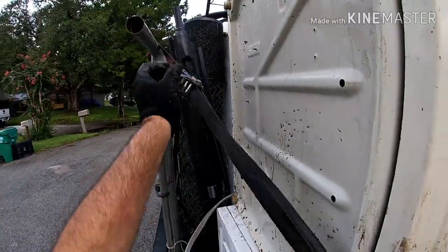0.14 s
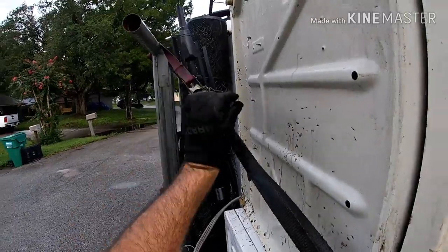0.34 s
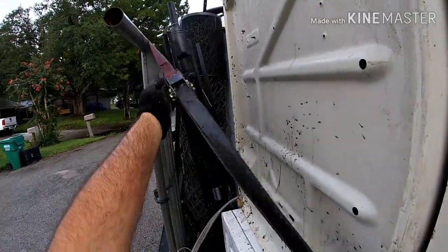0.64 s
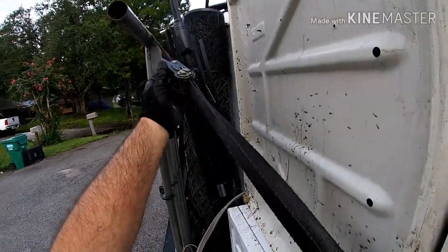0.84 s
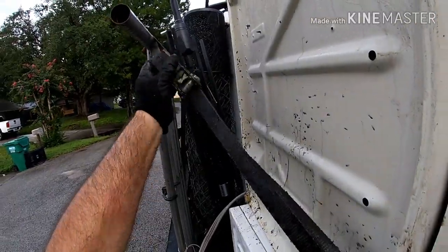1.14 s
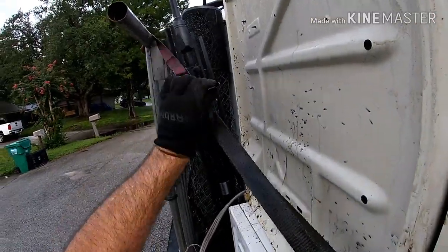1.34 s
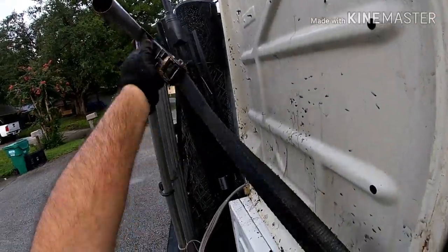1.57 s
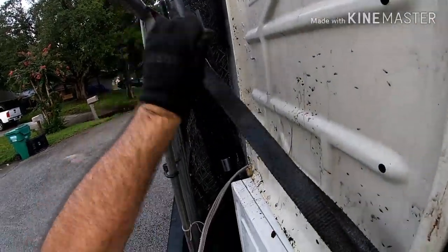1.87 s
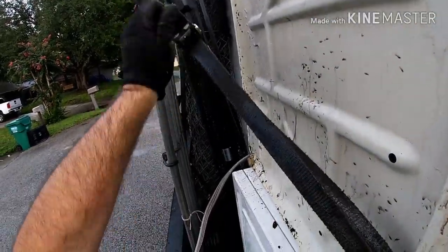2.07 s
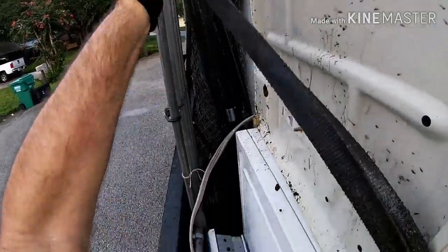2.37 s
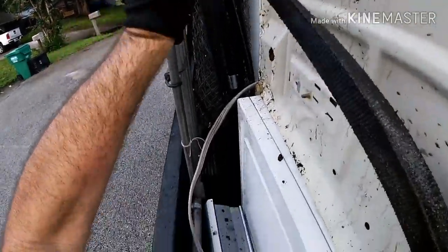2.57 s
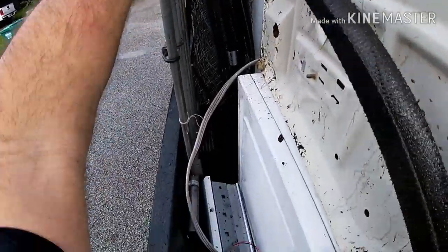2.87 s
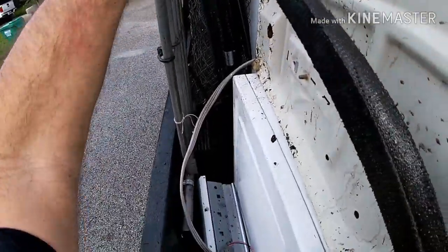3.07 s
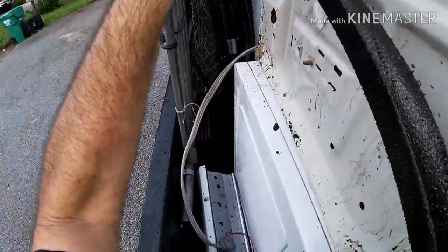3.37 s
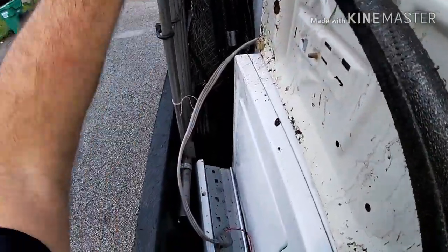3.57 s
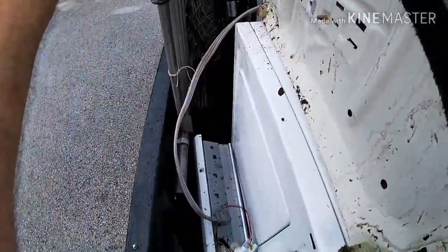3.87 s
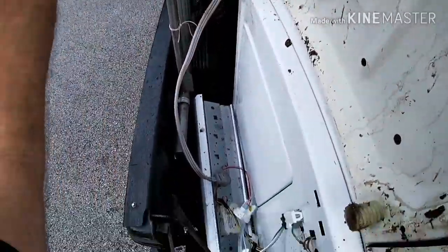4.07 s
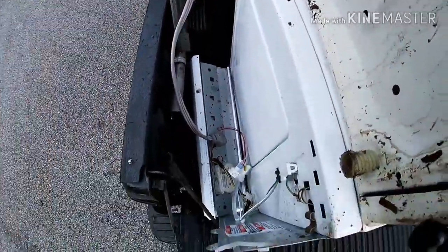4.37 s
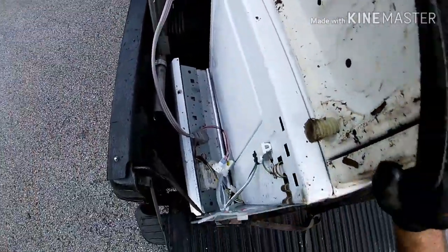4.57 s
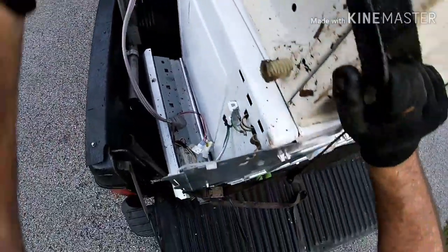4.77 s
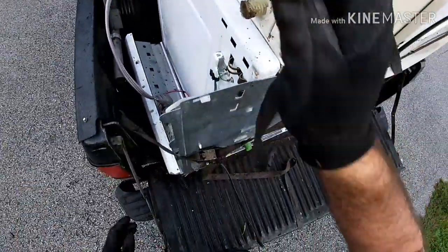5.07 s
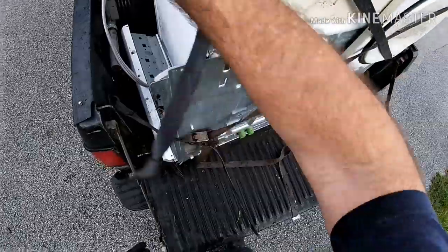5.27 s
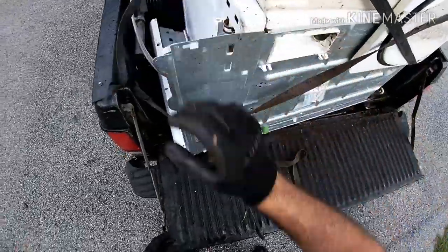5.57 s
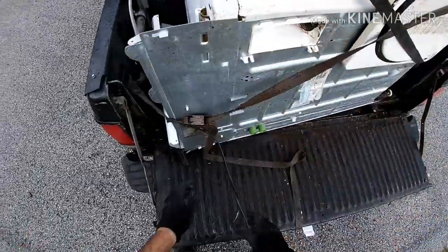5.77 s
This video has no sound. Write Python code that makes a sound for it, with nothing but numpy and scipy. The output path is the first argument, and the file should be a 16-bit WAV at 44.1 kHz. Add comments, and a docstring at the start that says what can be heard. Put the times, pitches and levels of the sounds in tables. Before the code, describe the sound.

A truck idles outdoors for the whole six seconds, a low, nearly steady drone around 100 Hz with a slight lope, rumble and soft engine-bay hiss. Very close and dry, a ratchet strap is cranked. One snap comes at 0.1 s, then a quick run of three at 0.27-0.37 and another at 0.65-0.72. After a pause with faint ticks, three more follow at 1.33-1.44. From 1.7 to 4.25 the bright steel clicks come mostly in pairs, a few times a second, with webbing rasp, glove rustle, loose handle ticks, brief zips and creaks. The sheet-metal load booms dully beneath, strongest near 3.7. A weak click at 4.4 and a strong last one at 4.55 end the cranking. Slight rubbing and tiny ticks fade by 5.2, leaving the idle. At 5.75 a single dull, heavy knock lands near the tailgate with a short panel rumble, as the hiss rises slightly.

```python
"""Outdoors, close beside a truck bed: a ratchet strap is cranked tight while the truck idles.
The idle is a stack of exhaust harmonics over rumble and engine-bay hiss; webbing and glove rub as coloured noise.
The steel pawl snaps as shaped noise through frame resonances, each tooth jolts the load, and the load booms dully.
Short fuzzy tones of narrow noise give a rustle, handle clunks, and zips and creaks of the strap.
Once the cranking is over, something knocks once near the tailgate: a light touch, a weight and a panel rumble."""
import sys
import numpy as np
from scipy import signal
from scipy.fft import rfft, irfft, next_fast_len
from scipy.io import wavfile
from scipy.ndimage import uniform_filter1d, map_coordinates

SR = 44100
rng = np.random.default_rng(int(sys.argv[2]) if len(sys.argv) > 2 else 0)


def inscribe(sig):
    """Save sig as 16-bit PCM at rate SR to the path in sys.argv[1].

    A 1-D sig is mono; a 2-D sig holds one channel per row.
    Samples are clipped to [-1, 1] before scaling.
    """
    pcm = np.round(np.clip(np.atleast_2d(sig).T, -1, 1) * 32767)
    wavfile.write(sys.argv[1], SR, pcm.astype(np.int16))


N = 261072  # samples

# Engine cycle rate: (t/s, f/Hz)
CYCLE_RATE = [(0.0, 19.29), (0.2, 19.56), (0.4, 19.78), (1.3, 19.78), (1.6, 19.66), (1.95, 20.07),
              (2.15, 19.54), (2.4, 19.82), (3.3, 19.57), (3.6, 20.05), (3.9, 20.34), (4.25, 20.56),
              (4.5, 19.76), (4.8, 19.9), (5.3, 19.68), (5.92, 19.8)]
# Exhaust harmonics, levels against one another: (multiple of the cycle rate, level/dB)
EXHAUST_HARMONICS = [(1, -50), (2, -15.5), (3, -10.5), (4, 1), (5, 4.5), (6, 0), (7, -25.5), (8, -33),
                     (9, -45), (10, -25), (11, -35.5), (12, -49), (15, -33.5)]
# Lope, repeating every third throb, on the same scale: (multiple of a third of the cycle rate, level/dB)
LOPE_HARMONICS = [(14, -26.5), (16, -20), (17, -10), (22, -23)]
EXHAUST_DB = -17.5  # harmonics and lope together
# Colour of the low engine rumble: (f/Hz, level/dB per Hz)
RUMBLE_COLOUR = [(12, -14.5), (40, -8), (70, -3.5), (105, -5), (135, -9.5), (200, -28), (700, -120)]
# Engine bay and street, rising at the end as the listener steps back from the truck's side: (t/s, level/dB)
BAY_LEVEL = [(0, -45), (1.1, -49.5), (2.8, -47.5), (3.6, -46.5), (4.9, -49), (5.92, -44)]
# Colour of engine bay and street: (f/Hz, level/dB per Hz)
BAY_COLOUR = [(150, -22.5), (200, -3), (300, -5.5), (500, -10), (810, -13.5), (1100, -18.5), (1450, -20.5),
              (1900, -27), (3100, -30), (4200, -37), (6200, -36), (7600, -40.5), (8700, -35.5),
              (9400, -46.5), (10600, -47.5), (12000, -72.5), (15000, -74.5)]

# Swings of the handle: (start t/s, length/s, webbing rub level/dB, load rumble level/dB)
HANDLE_SWINGS = [(0.015, .09, -63, -46), (0.184, 0.22, -54.5, -33), (0.551, 0.19, -57.5, -40),
                 (1.05, 0.067, -54, -49), (1.296, 0.16, -49, -35), (1.594, 0.13, -48, -35),
                 (1.887, .14, -45.5, -34), (2.197, 0.11, -47, -38.5), (2.459, 0.18, -48, -44),
                 (2.808, 0.099, -48, -32.5), (2.97, 0.11, -54, -39), (3.275, 0.19, -49.5, -31.5),
                 (3.63, 0.11, -46.5, -36.5), (3.936, 0.026, -46, -38), (4.036, 0.22, -49.5, -36.5),
                 (4.44, 0.12, -51.5, -39), (4.602, 0.14, -54.5, -41.5), (4.96, 0.069, -59.5, -49)]
# A swing takes hold, presses harder and eases off
GRIP_S, TIGHTEN_DB, EASE_T60_S = .015, 0.5, 0.23
# Colour of webbing sliding on the spool and glove on the handle: (f/Hz, level/dB per Hz)
RUB_COLOUR = [(590, -28), (1000, -8), (1150, -10), (1370, 3.5), (1610, -17.5), (1780, -7.5), (3180, -1),
              (3480, -3), (5920, -2.5), (7600, -8.5), (8320, -2), (11500, -16.5), (15000, -34.5)]
# Glove rustling on the handle, faint once the hand lets go: (t/s, level/dB)
GLOVE_LEVEL = [(0, -62.5), (2.4, -66.5), (3.2, -62), (4.8, -72), (5.3, -72.5)]
# The webbing gives after each tooth: level against the snap's middle register, and decay
GIVE_DB, GIVE_T60_S = -28.5, 0.15
# The weave slips in tiny catches: mean rate, spread of their size, and smooth hiss against them
CATCHES_PER_S, CATCH_SPREAD_DB, HISS_DB = 380, 4.5, -1

# Hard tugs at which the sheet-metal load shifts: (t/s, level/dB)
LOAD_TUGS = [(.73, -37), (1.64, -30), (1.74, -27.5), (2.22, -27.5), (2.52, -28), (2.67, -33), (2.97, -30),
             (3.08, -26), (3.68, -21), (3.98, -37), (4.39, -28), (4.7, -38)]
# Colour of the tugged sheet-metal load: (f/Hz, level/dB per Hz)
BOOM_COLOUR = [(40, -30), (75, -7.5), (115, -1.5), (135, -2), (150, 2), (180, -9.5), (215, -10),
               (270, -18.5), (400, -27.5), (560, -25), (1000, -37), (2000, -60.5), (6000, -120)]
# The load's boom: rise, ring time, and level of the boom that each tooth sets off
BOOM_RISE_S, BOOM_T60_S, TOOTH_BOOM_DB = 0.011, 0.35, -31

# Short fuzzy tones: a rustle, handle clunks, and zips and creaks of the strap:
# (t/s, length/s, start f/Hz, end f/Hz, level at the middle/dB)
FUZZY_TONES = [(0.031, 0.1, 1720, 1710, -52), (1.653, 0.052, 4000, 4170, -41),
               (2.201, 0.037, 1420, 1310, -42.5), (3.258, 0.081, 2900, 2620, -50.5),
               (3.619, 0.14, 1420, 1358, -45.5), (4.436, .075, 2600, 3390, -46.5),
               (4.48, 0.078, 3300, 3530, -55), (4.602, 0.2, 3400, 3390, -59.5)]

# Pawl snaps: (t/s, low register level/dB, middle level/dB, top level/dB,
#              favoured ring f/Hz, chatter/ms, scrape level against the blow/dB)
PAWL_SNAPS = [(0.1046, -23, -25, -26, 3230, 0.88, -20.5), (0.265, -29.5, -19, -33.5, 7720, 0.6, -22),
              (0.319, -26, -19, -30.5, 8360, 0.9, -17), (0.3655, -27, -18.5, -30.5, 8200, 1.4, -15),
              (0.6532, -24, -17, -31, 6760, 2.6, -28), (0.6881, -29.5, -16, -30.5, 6900, 1, -22),
              (0.7247, -24, -19.5, -28, 6010, 1.4, -21.5), (1.3303, -23.5, -23.5, -29.5, 3760, 1.4, -16),
              (1.3776, -21.5, -21.5, -27, 4220, 1.3, -13), (1.4396, -26, -23, -37, 4930, 1.3, -12),
              (1.7012, -24, -17.5, -32.0, 7700, 1.2, -22), (1.734, -21.5, -19, -29, 7440, 2.5, -23.5),
              (1.9816, -21, -18.5, -30.5, 4050, 2.1, -34), (2.0254, -23.0, -21, -27.5, 8200, 1.9, -15),
              (2.2829, -24, -19, -24.5, 6140, 2.8, -10), (2.3192, -21, -22.5, -34, 3300, 0.92, -5),
              (2.5843, -23.5, -18.5, -27, 6630, 3.6, -7), (2.6545, -24.5, -22, -28.5, 6330, 1.5, -9.5),
              (2.9195, -21, -16.5, -22, 6270.0, 1.2, -28), (2.9587, -26, -22.5, -26.3, 5270, 1.5, -25.5),
              (3.0828, -23, -18.5, -26.5, 6270, 0.69, -36), (3.364, -24, -18.5, -29.5, 8250, 0.87, -22),
              (3.4319, -23.5, -18, -30.5, 5490, 0.88, -14), (3.6848, -29, -23.5, -39, 5680, 1.1, -16),
              (3.765, -26, -15.5, -26.5, 7660, 4.1, -15.5), (3.8488, -20, -20, -32, 3230, 4.9, -14),
              (4.1568, -24, -17, -27, 8600, 1.5, -6.5), (4.2378, -24.5, -21.5, -29.5, 9400, 1.4, -12),
              (4.4031, -35, -25.5, -40, 7700, 0.51, -21), (4.5523, -20.5, -16.5, -25, 3200, 1.4, -21)]
# Clearest ticks of the loose handle and spool: (t/s, level of the loudest 2 ms/dB, favoured ring f/Hz)
LOOSE_TICKS = [(0.169, -42.5, 3650), (0.218, -40.5, 2950), (0.582, -37, 3970), (0.599, -34, 3870),
               (0.958, -47.5, 5700), (0.976, -43.5, 3700), (1.07, -41.5, 3810), (1.19, -47, 3600),
               (1.655, -35.5, 5150), (1.923, -26, 3420), (2.221, -32, 5350), (2.24, -33, 4140),
               (2.504, -28.5, 8460), (2.808, -29.5, 6190), (3.21, -41, 6400), (3.271, -39, 3040),
               (3.357, -27.5, 6500), (3.52, -30, 3460), (3.704, -28, 5000), (3.8, -30.5, 3040),
               (3.83, -33, 2480), (3.946, -35, 4930), (4.048, -34.5, 8600), (4.231, -26.5, 8600),
               (4.473, -38, 3170), (5.003, -47.5, 4000), (5.164, -50.5, 3140)]
# Colour of the steel frame: (f/Hz, level/dB per Hz)
STEEL_COLOUR = [(600, -28), (1200, -16.5), (1800, -13.5), (2400, -6.5), (3200, -1.5), (5000, 0), (8500, -3),
                (9500, -11.5), (10500, -11.5), (12500, -17.5), (15000, -32), (16500, -50)]
# Resonances of frame and handle, before each blow's random change: (f/Hz, half-width/Hz, level/dB)
FRAME_RESONANCES = [(2376, 320, 1), (3300, 260, 1.5), (3970, 130, 2.5), (4420, 130, 2.5), (5700, 280, 0.5),
                    (6400, 330, 0.5), (6960, 190, -3), (7400, 250, 3), (8760, 320, 5.5), (10120, 290, 4.5),
                    (12000, 410, -3.5)]
# Boost of the frame's lowest ring: it fills out as the strap tightens, then drops back: (t/s, level/dB)
LOW_RING_BOOST = [(0, -10.5), (2.5, 0.5), (3.8, 5.5), (4.5, 0.5)]
LOW_RING_HZ, LOW_RING_WIDTH_HZ = 2380, 540
# Fainter random ticks in each swing: rate, level over the rub, spread of level, typical ring
RATTLE_PER_S, RATTLE_DB, RATTLE_SPREAD_DB, RATTLE_HZ = 10, 7.5, 1, 4040
# Colour of the jolt down the strap: (f/Hz, level/dB per Hz)
JOLT_COLOUR = [(120, -12.0), (220, -1.5), (550, 0), (1000, -6.0), (1500, -18.0), (2500, -23), (6000, -120)]

# The knock, its parts set against this level: (t/s, level/dB)
TAILGATE_KNOCK = (5.752, -27)
# Colours of its first touch, its full weight and its panels: (f/Hz, level/dB per Hz)
TOUCH_COLOUR = [(500, -27), (2200, 6), (4500, 3), (9000, -14), (13000, -42)]
WEIGHT_COLOUR = [(150, -8), (235, 7.5), (380, -0.5), (470, 0), (570, -8.5), (820, 0), (1300, -15),
                 (1900, -13), (2700, -15), (3400, -35), (4000, -24), (6000, -35), (10000, -42),
                 (13000, -65)]
PANEL_COLOUR = [(150, -11), (260, -2), (450, -4), (900, -8), (2000, -29), (5000, -68)]

TOP_HZ = 15800  # upper band limit at the microphone


def amp(db):
    """Amplitude factor of a level in dB."""
    return 10 ** (np.asarray(db) / 20)


def unit(x):
    """x scaled to rms 1."""
    return x / np.sqrt(np.mean(x ** 2) + 1e-20)


def along(points, hz):
    """(f/Hz, value) points interpolated on a log frequency axis."""
    f, v = np.transpose(points)
    return np.interp(np.log(hz + 1), np.log(f + 1), v)


def curve(rows):
    """(t/s, value) rows as one value per sample."""
    return np.interp(np.arange(N) / SR, *np.transpose(rows))


def wobble(rate):
    """A smooth random curve, rate knots a second."""
    knots = rng.standard_normal(int(N * rate / SR) + 4)
    return map_coordinates(knots, [np.arange(N) * rate / SR])


def filtered(x, response):
    """x with its spectrum multiplied by a response of frequency."""
    m = next_fast_len(2 * len(x))
    return irfft(rfft(x, m) * response(np.fft.rfftfreq(m, 1 / SR)), m)[:len(x)]


def noise(response, size):
    """Noise of rms 1 with the given gain over frequency."""
    spectrum = rfft(rng.standard_normal(size))
    return unit(irfft(spectrum * response(np.fft.rfftfreq(size, 1 / SR)), size))


def coloured(points, size=N):
    """Noise of rms 1 with a (f/Hz, level/dB) colour."""
    return noise(lambda hz: amp(along(points, hz)), size)


def patchy(x, depth_db, order, count):
    """x at rms 1 with random patches of gain, order frequency bins wide and count frames long."""
    z = signal.stft(x, nperseg=512)[2]
    field = uniform_filter1d(rng.standard_normal(z.shape), order, axis=0)
    field = uniform_filter1d(field, count, axis=1)
    return unit(signal.istft(z * amp(depth_db * unit(field)), nperseg=512)[1][:N])


def add(track, s, sound):
    """Mix a sound into the track at time s."""
    part = track[max(round(s * SR), 0):][:len(sound)]
    part += sound[:len(part)]


def swing(s, length):
    """Effort over one swing of the handle: take hold, press ever harder, ease off."""
    t = np.arange(N) / SR - s
    pressure_db = TIGHTEN_DB * (np.clip(t / length, 0, 1) - .5)
    ease_db = -60 * np.maximum(t - length, 0) / EASE_T60_S
    return np.clip(t / GRIP_S, 0, 1) * amp(pressure_db + ease_db)


def surges(events, rise_s, t60):
    """Joint strength of (t/s, level/dB) surges that rise quickly and die away, summed in power."""
    power, t = np.zeros(N), np.arange(SR // 2) / SR
    for s, db in events:
        decay = amp(db - 60 * np.maximum(t - rise_s, 0) / t60)
        add(power, s, (np.minimum(t / rise_s, 1) * decay) ** 2)
    return np.sqrt(power)


def engine():
    """An uneven idle: exhaust harmonics throb with a slower lope, and the engine bay hisses in step."""
    turn = 2 * np.pi * (np.cumsum(curve(CYCLE_RATE)) / SR - .07)

    def harmonics(rows, spread_db, level_rate, jitter, jitter_rate):
        # the pipe shifts the harmonics on both sides of its resonance, which evens the throb into a drone
        total = 0
        for k, db in rows:
            phase = k * turn + np.pi / 3 * abs(k - 5)
            total = total + amp(db + spread_db * wobble(level_rate)) * np.cos(phase + jitter * wobble(jitter_rate))
        return total

    # cycles differ a little in strength and timing, the weak harmonics most
    strong = harmonics(EXHAUST_HARMONICS[3:6], .8, 12, .07, 16)
    weak = harmonics(EXHAUST_HARMONICS[:3] + EXHAUST_HARMONICS[6:], 2.2, 8, .26, 9)
    lope = sum(amp(db + 2 * wobble(4)) * np.cos(k * turn / 3 + .5 * wobble(4)) for k, db in LOPE_HARMONICS)
    exhaust = amp(EXHAUST_DB) * unit(strong + weak + lope)
    rumble = amp(-35.5) * coloured(RUMBLE_COLOUR)
    bay_db = curve(BAY_LEVEL) + 0.95 * np.cos(turn) + 0.86 * wobble(25)
    bay = amp(bay_db) * patchy(coloured(BAY_COLOUR), depth_db=1.5, order=4, count=20)
    return exhaust + rumble + bay


def webbing():
    """On swings and after teeth the weave slips in tiny catches over a shifting hiss; the glove rustles too."""
    caught = rng.random(N) < CATCHES_PER_S / SR
    size = amp(CATCH_SPREAD_DB * rng.standard_normal(N))
    catches = caught * size * np.sign(rng.standard_normal(N))
    grains = unit(filtered(catches, lambda hz: amp(along(RUB_COLOUR, hz))))
    slide = patchy(grains + amp(HISS_DB) * coloured(RUB_COLOUR), depth_db=3.5, order=6, count=7)
    grip_db = 2 * wobble(130)  # the glove sticks and slides
    pull = np.linalg.norm([amp(db) * swing(s, length) for s, length, db, _ in HANDLE_SWINGS], axis=0)
    gives = [(s, middle_db + GIVE_DB) for s, _, middle_db, *_ in PAWL_SNAPS]
    give = surges(gives, rise_s=0.0052, t60=GIVE_T60_S)
    effort = np.linalg.norm([pull, give, amp(curve(GLOVE_LEVEL))], axis=0)
    return effort * amp(grip_db) * slide


def load():
    """Swings, teeth and tugs shake the sheet metal under the strap, with a shifting mix of panel resonances."""
    strain = [amp(db) * swing(s, length) for s, length, _, db in HANDLE_SWINGS]
    tooth_booms = [(s, TOOTH_BOOM_DB) for s, *_ in PAWL_SNAPS]
    booms = surges(LOAD_TUGS + tooth_booms, BOOM_RISE_S, BOOM_T60_S)
    metal = patchy(coloured(BOOM_COLOUR), depth_db=2.5, order=3, count=12)
    return np.linalg.norm(strain + [booms], axis=0) * metal


def fuzzy_tones():
    """A rustle, handle clunks, zips and creaks: low noise moved up to a gliding pitch, swelling and fading."""
    out = np.zeros(N)
    for s, length, start_hz, end_hz, db in FUZZY_TONES:
        u = np.linspace(0, 1, max(round(length * SR), 64))
        fuzz = noise(lambda hz: 1 / (1 + (hz / 220) ** 2), len(u))
        glide_hz = start_hz + (end_hz - start_hz) * u
        tone = unit(fuzz * np.sin(2 * np.pi * np.cumsum(glide_hz) / SR))
        add(out, s, amp(db) * np.sin(np.pi * u) ** 2 * tone)
    return out


def snap(t, ring_hz, chatter_ms, ring_db, scrape_db, tail_db):
    """Steel on steel at t = 0: a short scrape, a chattering blow, and a ring that the taut webbing damps."""
    after = np.maximum(t, 0)
    blow = amp(-60 * np.maximum(after - chatter_ms / 1000, 0) / .011)
    ring = amp(tail_db - 60 * after / 0.044) + amp(-29 - 60 * after / .07)
    rattle = amp(3 * unit(uniform_filter1d(rng.standard_normal(len(t)), size=SR // 500)))
    scrape = amp(scrape_db) * np.exp(-((t + .0025) / .002) ** 2)
    strength = np.where(t < 0, scrape, np.hypot(blow, ring * rattle))
    # each tooth meets the pawl at another spot and favours other resonances of the frame
    peaks = [(hz, width, db + 3.8 * rng.standard_normal()) for hz, width, db in FRAME_RESONANCES]
    peaks.append((ring_hz, 300, ring_db))

    def frame(hz):
        peaks_db = sum(db / (1 + ((hz - centre) / width) ** 2) for centre, width, db in peaks)
        return amp(along(STEEL_COLOUR, hz) + peaks_db)

    return strength * noise(frame, len(t))


def sized(x, db):
    """x scaled so that its loudest two milliseconds have the given rms level."""
    return amp(db) * x / np.sqrt(np.max(uniform_filter1d(x ** 2, size=SR // 500)))


def rattles():
    """Random faint ticks during the swings, at most eight in each, as (t/s, level/dB, ring f/Hz)."""
    ticks = []
    for s, length, rub_db, _ in HANDLE_SWINGS:
        waits = np.cumsum(rng.exponential(size=8)) / RATTLE_PER_S
        for wait, size, pitch in zip(waits, *rng.standard_normal((2, 8))):
            if wait < length:
                db = rub_db + RATTLE_DB + RATTLE_SPREAD_DB * size
                ticks.append((s + wait, db, RATTLE_HZ * np.exp(.3 * pitch)))
    return ticks


def ratchet():
    """The pawl snaps over teeth, its low ring varying with tension; loose parts tick through the same frame."""
    out, lead = np.zeros(N), .012  # s of room for the scrape before each blow
    t = np.arange(SR // 8) / SR - lead

    def below(hz, edge_hz):
        return 1 / (1 + (hz / edge_hz) ** 16)

    registers = [lambda hz: below(hz, 5000),
                 lambda hz: below(hz, 9500) - below(hz, 5000),
                 lambda hz: 1 - below(hz, 9500)]

    def tensioned(x, s):
        boost_db = np.interp(s, *np.transpose(LOW_RING_BOOST))
        return filtered(x, lambda hz: amp(boost_db * np.exp(-((hz - LOW_RING_HZ) / LOW_RING_WIDTH_HZ) ** 2)))

    for s, low_db, middle_db, top_db, ring_hz, chatter_ms, scrape_db in PAWL_SNAPS:
        click = tensioned(snap(t, ring_hz, chatter_ms, ring_db=9.0, scrape_db=scrape_db, tail_db=-15.5), s)
        for register, db in zip(registers, (low_db, middle_db, top_db)):
            add(out, s - lead, sized(filtered(click, register), db))
    for s, db, ring_hz in LOOSE_TICKS + rattles():
        tick = tensioned(snap(t, ring_hz, chatter_ms=1.2, ring_db=10, scrape_db=-16.5, tail_db=-15.5), s)
        add(out, s - lead, sized(tick, db))
    return out


def jolts():
    """Each tooth that catches sends a short, dull jolt down the strap into the load."""
    out, t = np.zeros(N), np.arange(SR // 16) / SR
    for s, _, middle_db, *_ in PAWL_SNAPS:
        thud = coloured(JOLT_COLOUR, size=len(t))
        add(out, s, amp(middle_db - 25.5 - 60 * t / 0.036) * thud)
    return out


def knock():
    """A dull knock: a light first touch, then the full weight lands and the panels rumble on."""
    out, t = np.zeros(N), np.arange(SR // 5) / SR
    s, db = TAILGATE_KNOCK
    touch = amp(-8 - 60 * t / 0.034) * coloured(TOUCH_COLOUR, size=len(t))
    weight = (1 - np.exp(-t / 0.0014)) * amp(-60 * t / 0.059) * coloured(WEIGHT_COLOUR, size=len(t))
    panels = amp(-60 * t / 0.18) * coloured(PANEL_COLOUR, size=len(t))
    add(out, s, amp(db) * touch)
    add(out, s + .003, amp(db + 10.5) * weight)
    add(out, s + .008, amp(db - 3.0) * panels)
    return out


def scene():
    """One microphone in the open air, everything close: the sources add up with no reverberation."""
    return (engine() + webbing() + load() + fuzzy_tones() + ratchet() + jolts() + knock())[None]


def record(dry):
    """A few milliseconds of fade at both ends avoid clicks where the steady idle is cut; the band ends at TOP_HZ."""
    faded = dry * curve([(0, 0), (.004, 1), (N / SR - .008, 1), (N / SR, 0)])
    return np.array([filtered(x, lambda hz: 1 / (1 + (hz / TOP_HZ) ** 80)) for x in faded])


dry = scene()
out = record(dry)
inscribe(out)
```